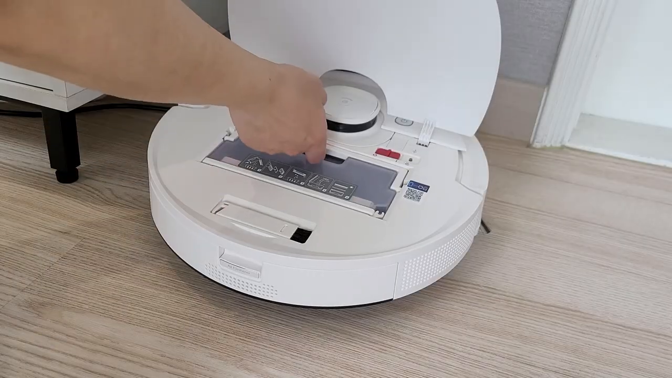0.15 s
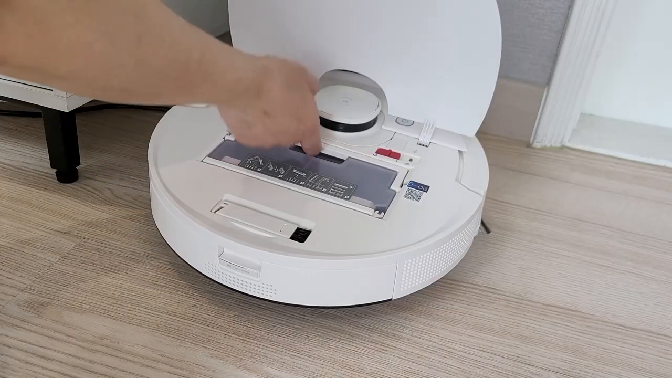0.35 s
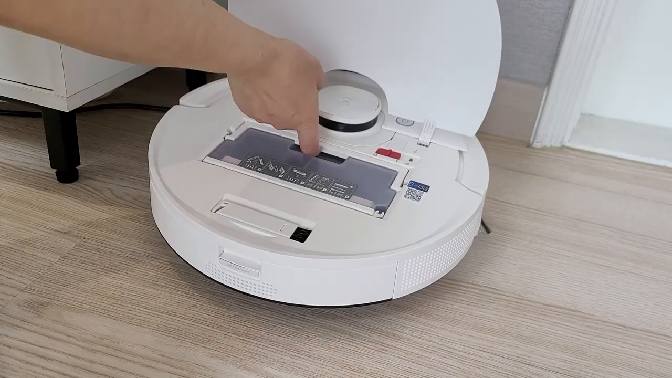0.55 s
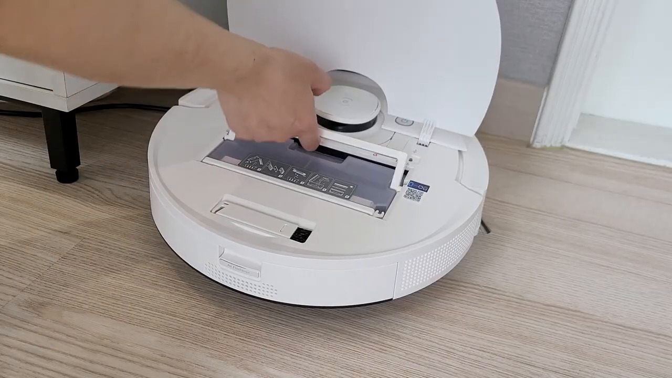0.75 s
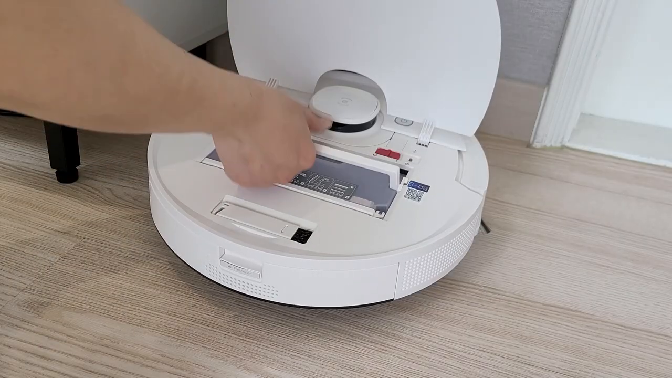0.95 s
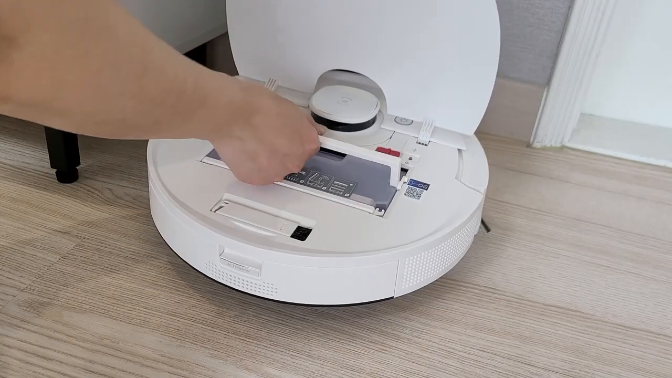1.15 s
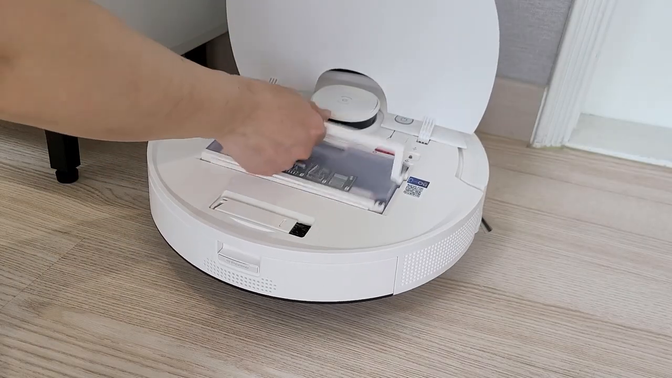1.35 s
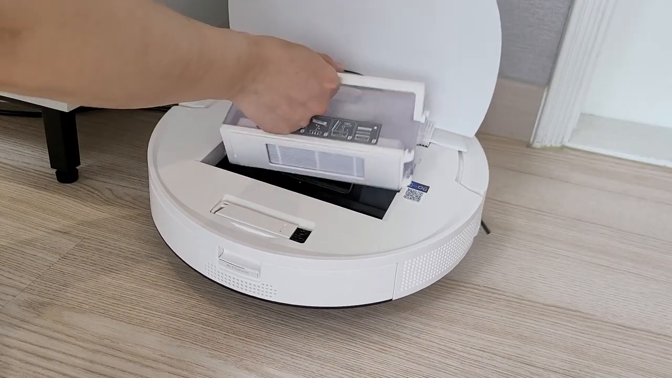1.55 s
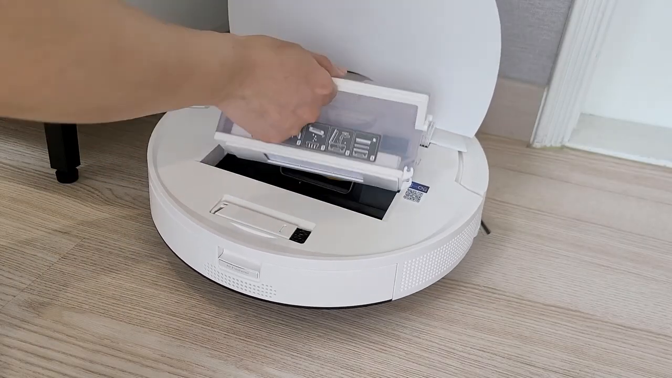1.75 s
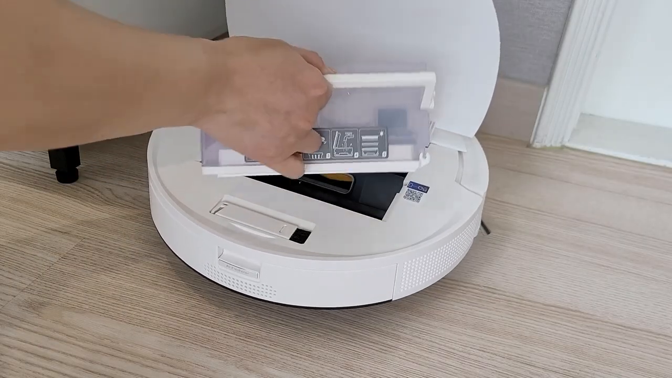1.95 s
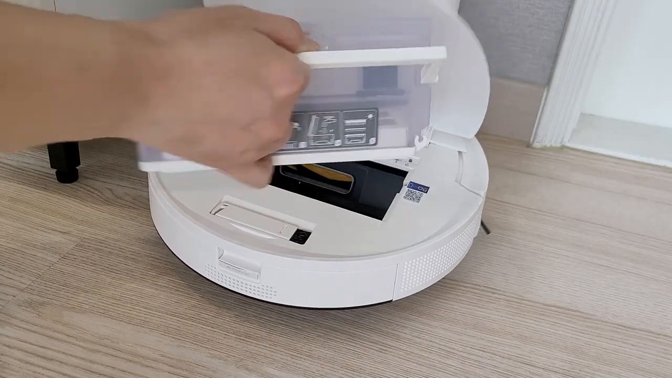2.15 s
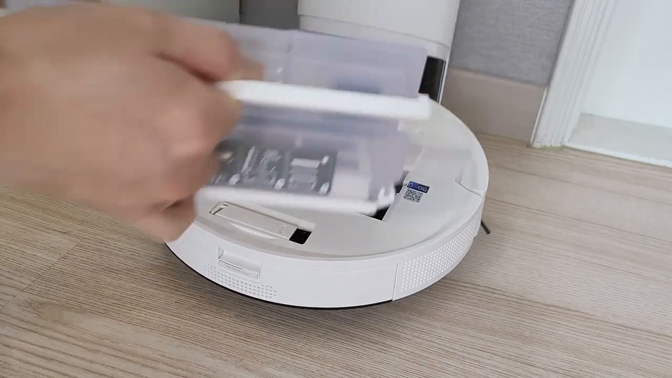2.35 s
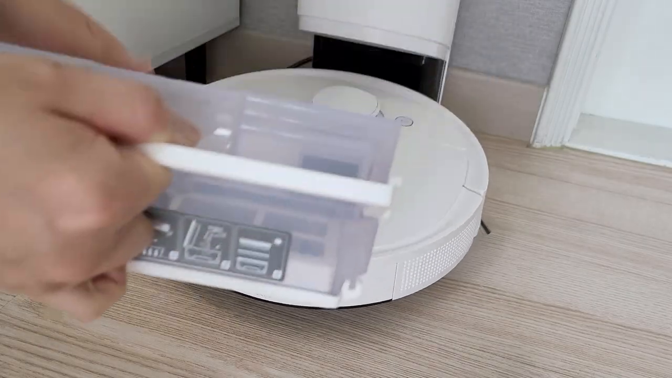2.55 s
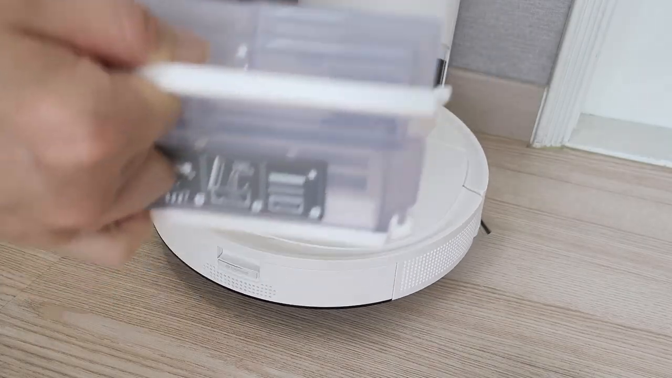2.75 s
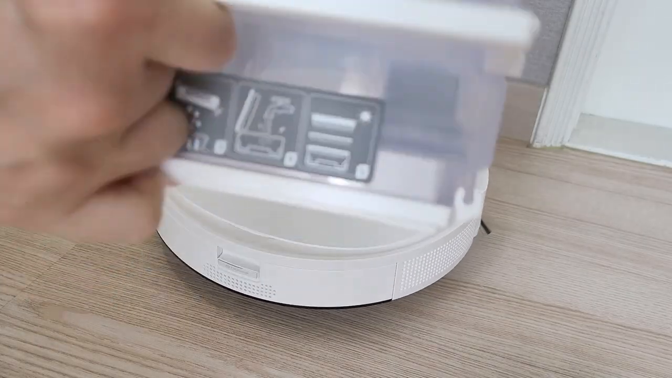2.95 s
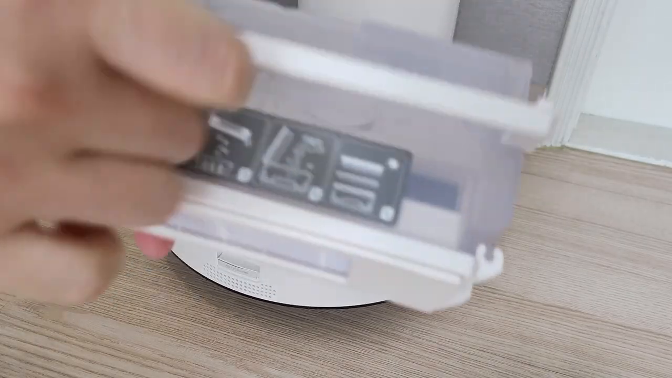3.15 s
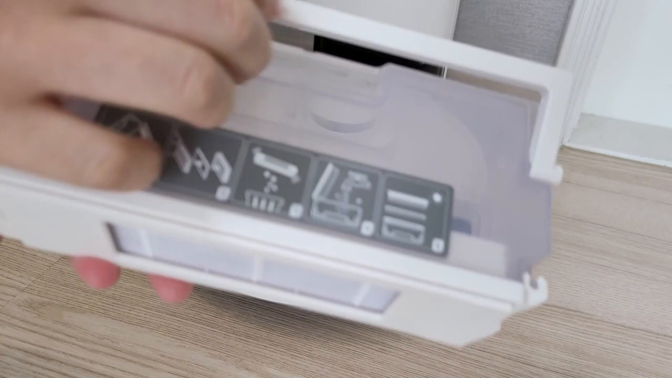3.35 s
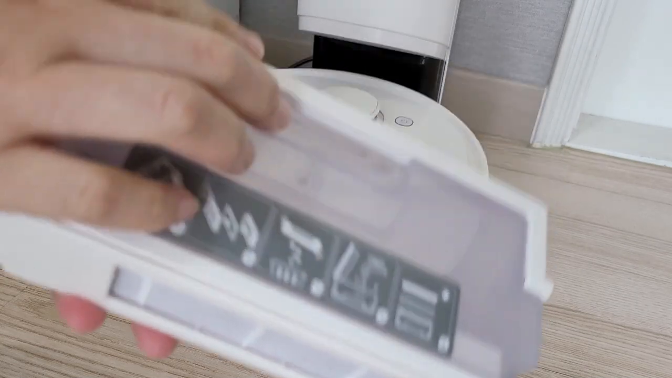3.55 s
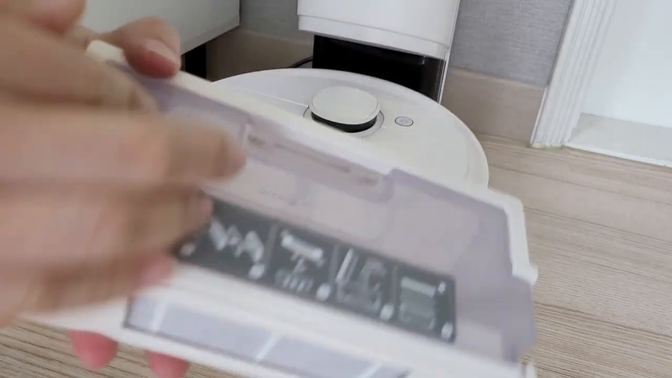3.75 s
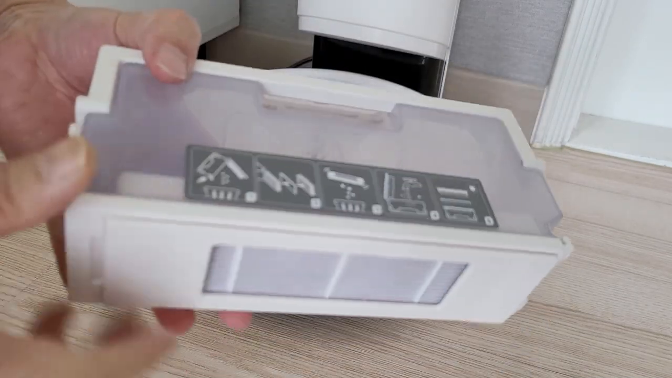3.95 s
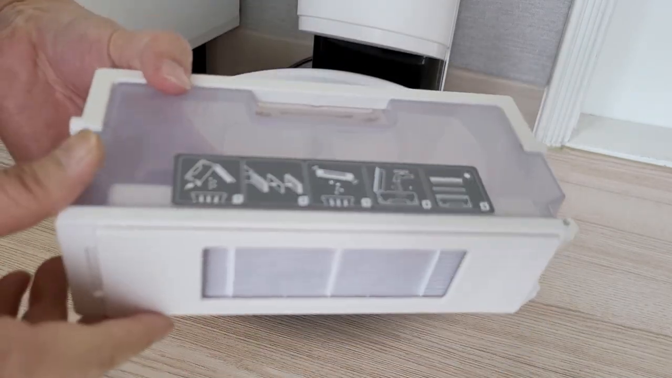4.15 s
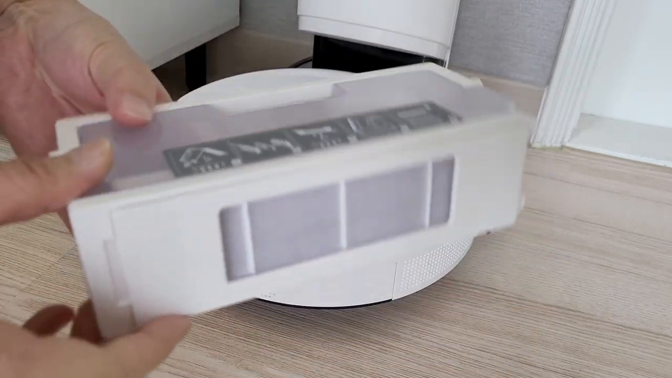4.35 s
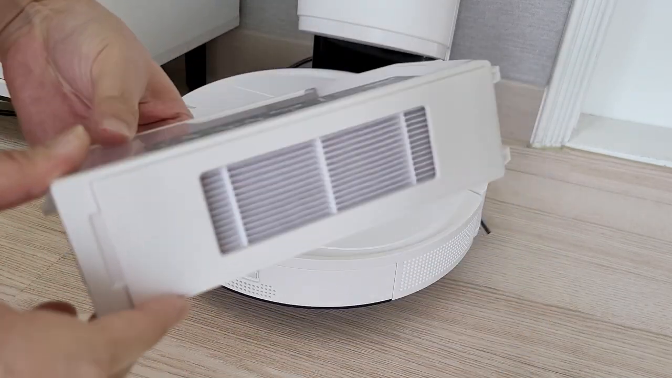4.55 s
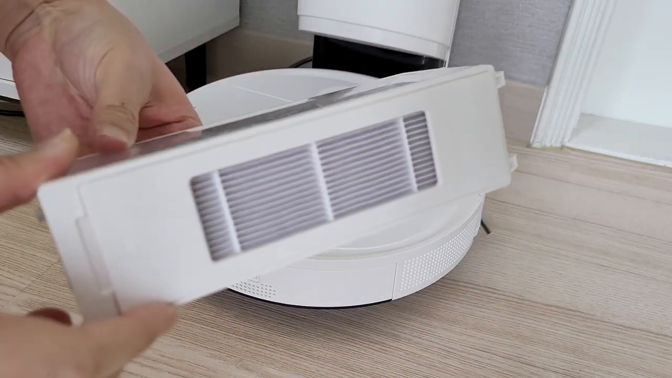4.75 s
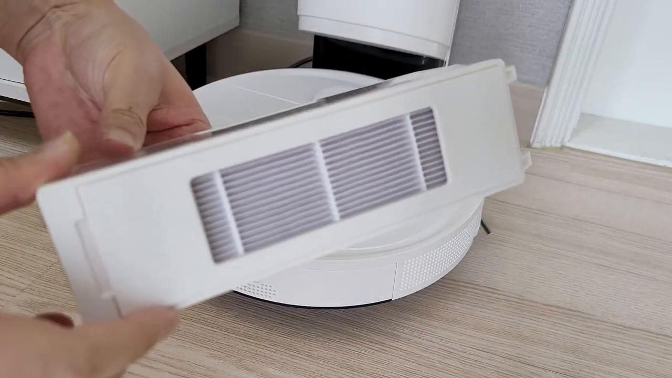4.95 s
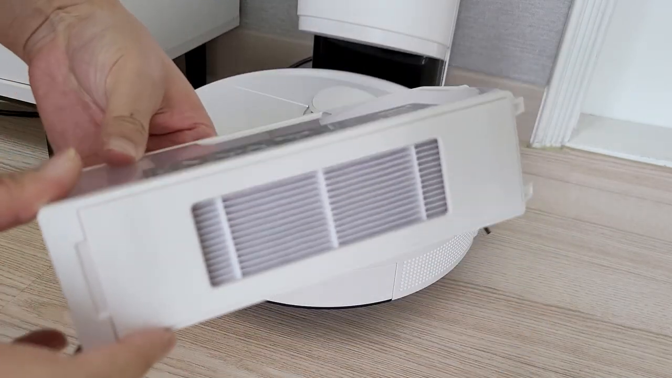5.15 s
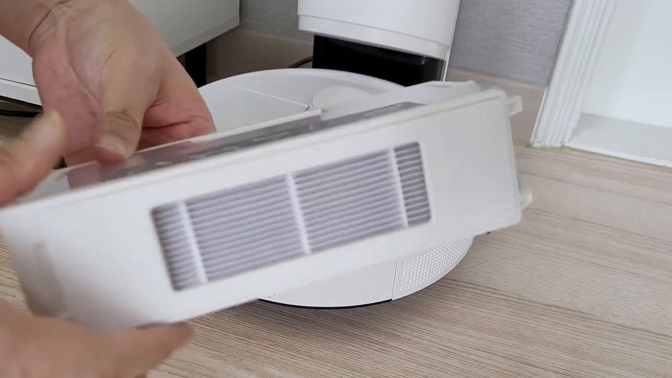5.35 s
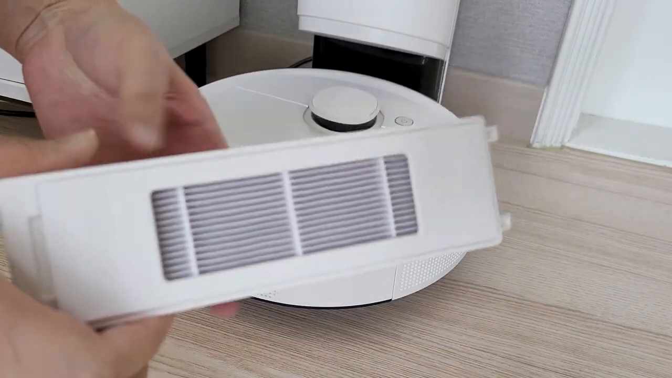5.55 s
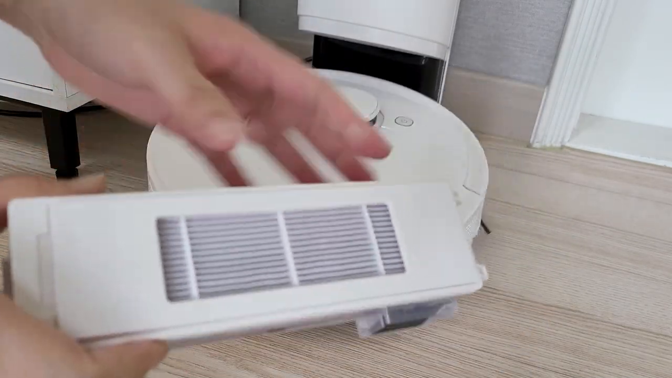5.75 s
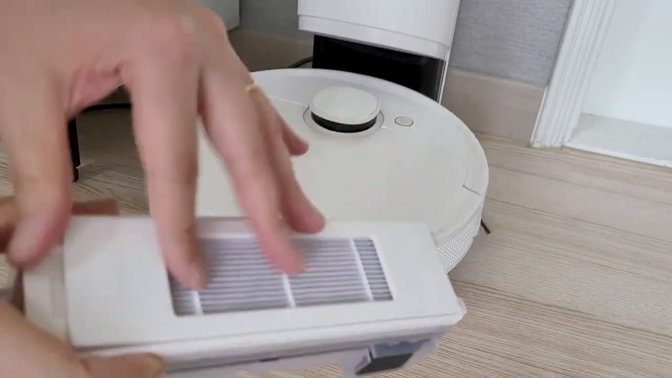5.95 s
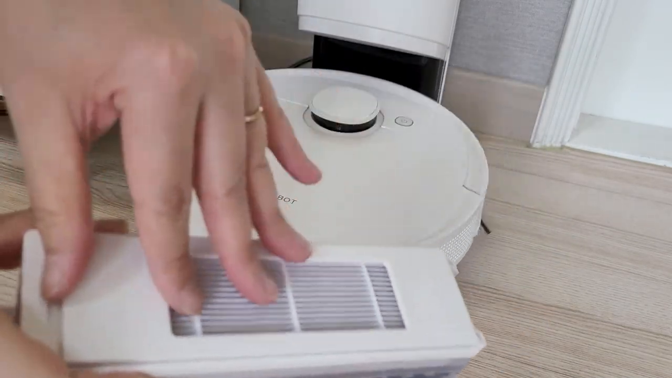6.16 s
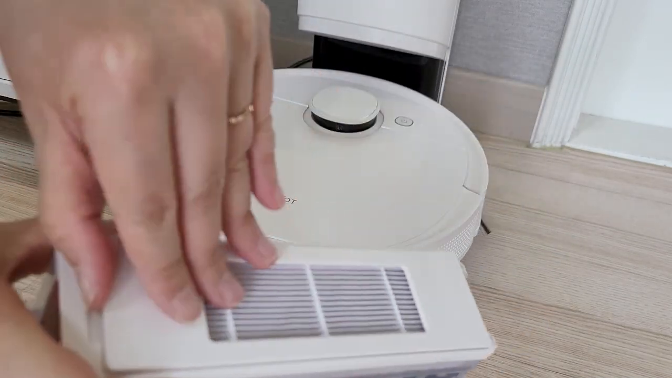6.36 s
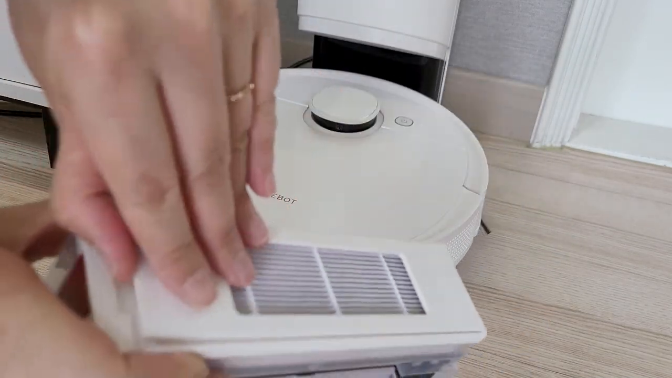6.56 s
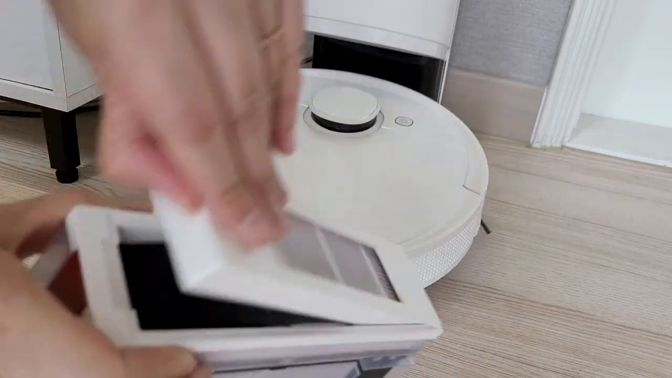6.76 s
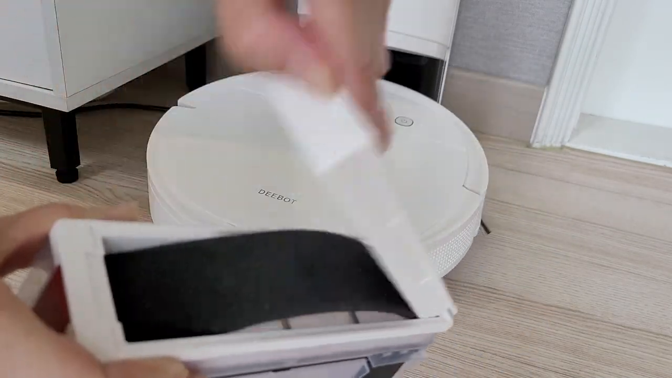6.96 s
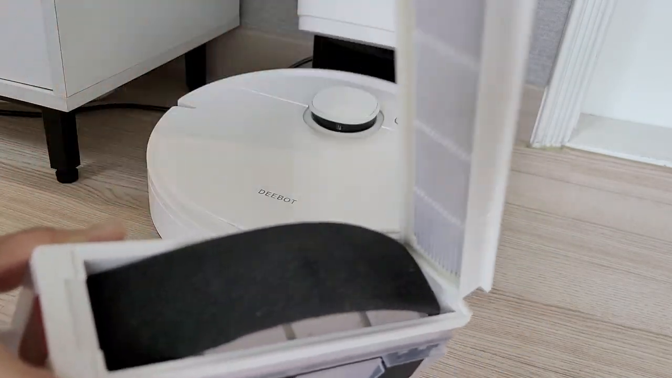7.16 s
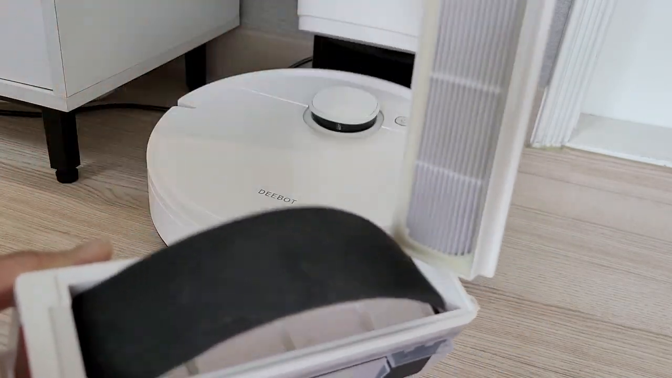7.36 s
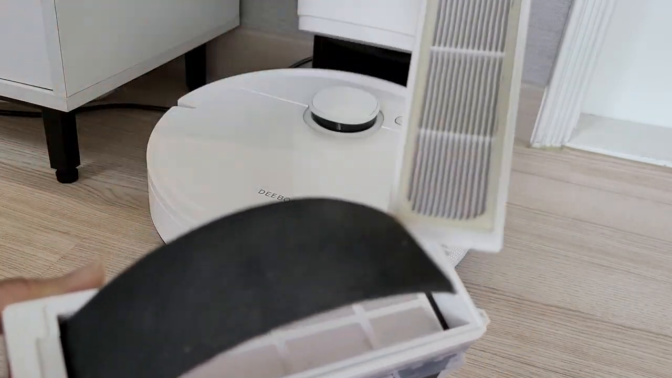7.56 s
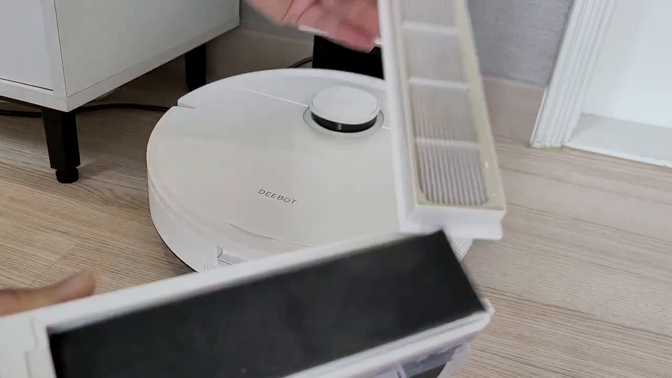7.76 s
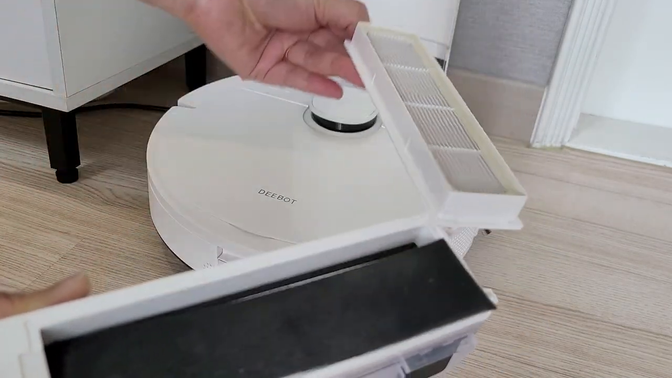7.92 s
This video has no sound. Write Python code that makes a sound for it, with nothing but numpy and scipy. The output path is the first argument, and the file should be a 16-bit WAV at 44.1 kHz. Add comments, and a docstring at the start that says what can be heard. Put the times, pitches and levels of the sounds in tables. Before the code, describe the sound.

A small, quiet room with faint low air noise, a barely audible wavering hum and soft rumble from the hand holding the microphone. Soft fingertip bumps lead to a moderate plastic clack at 0.6 seconds as a handle flips up, with more soft touches near 1.0. From 1.3 to 1.65 a loud, dense cluster of hollow knocks, rattles and scraping bursts out as the bin is tugged free. At 2.4 a lid slams with a full, low-bodied bang and short room echo. Small clicks and rubs around 3.0 to 3.4 precede a hard, bright, very short snap at 3.55. Then it is much quieter: light clicks and a scrape near 4.1, a gap, clicks at 5.6 and 5.9, skin scuffing from 6.1, dull plastic pops at 6.7, a tiny hoarse hinge squeak at 7.33, and light hollow knocks at 7.8 to 7.9 with a brief ring.

```python
"""Emptying a robot vacuum's dust bin

The dust bin comes out of a silent robot vacuum in a small, quiet room, close to a hand-held phone.
The handle flips up, the bin is tugged free and scrapes out, the lid drops shut, the handle snaps down.
Fingers then turn the hollow bin over and swing its filter frame open on a squeaky hinge.
Blows are a push, noisy clatter and ringing modes; rubbing is tiny slips or shaped noise.
Echoes, room noise, faint tones and the rumble of the hand on the phone lie around them."""
import sys
import numpy as np
from scipy import signal
from scipy.fft import rfft, irfft, next_fast_len
from scipy.io import wavfile
from scipy.ndimage import uniform_filter1d, minimum_filter1d

SR = 44100
rng = np.random.default_rng(int(sys.argv[2]) if len(sys.argv) > 2 else 0)


def store_wav(level_fs):
    """Save 16-bit WAV to argv[1]."""
    pcm = np.round(np.clip(np.atleast_2d(level_fs), -1, 1) * 32767)
    wavfile.write(sys.argv[1], SR, pcm.T.astype(np.int16))


N = 352359
TIME = np.arange(N) / SR

# Blows on the robot's body. Each row: start in seconds, level in dB, hardness in dB, lowest sound in Hz,
# wall resonance that is hit in Hz, its lift in dB, left minus right in dB.
BODY_KNOCKS = [(.613, -23, -5, 240, 401, 2, 5), (.6235, -15, -3, 175, 245, 6, 0),
               (.643, -21, -14, 150, 382, 6, 4), (.668, -25.5, -6.5, 197.8, 700, 3.5, 2),
               (.868, -30.5, -3.5, 170, 960, 3.5, 4), (1.347, -21, -9.5, 381.4, 500, 2, -0.5),
               (1.3565, -3, 1.5, 280, 540, 2.5, 3), (1.381, 6, -3.5, 428.3, 690, 8, -4.5),
               (1.399, -10.5, 4.5, 281.6, 2800, 0, -3.5), (1.412, -7, -6, 340.5, 430, 6, 3.5),
               (1.4262, 1.5, -4.5, 520.7, 898.5, 5.5, 2), (1.432, -11.5, -12, 220, 376, 6, -2.5),
               (1.44, -8.5, 8.5, 258.6, 840, 5.5, 4.5), (1.451, -8, -2.5, 381, 600, 3, -3),
               (1.474, -13, -7, 260, 610, -0.5, 0), (1.516, -19, -16, 297, 645, 5, -1),
               (1.607, -13.5, 3, 252, 460, 2.5, 0.5), (1.626, -15, -16, 271, 592, 6.5, -3.5),
               (2.455, -10, -0.5, 153, 560, 1.5, -0.5), (2.472, -7.5, -3.5, 71.8, 310, 1, -4),
               (2.497, -13, 3.5, 88.8, 169, 4, 3.5), (2.63, -27, -7, 136.5, 188, 2, 3)]
# Resonances of the body. Each row: pitch in Hz, level in dB, time to fade by 60 dB in seconds.
BODY_MODES = [(102.7, -5.5, 0.5), (178, -3, .17), (208, -1, 0.17), (258, -2.5, 0.093), (286, -5, 0.13),
              (385.5, 1, .32), (453.5, -1.5, .22), (560, -1, .35), (690, -0.5, 0.079), (740, -1.5, 0.32),
              (1003, -5, 0.16), (1346, -7, .14), (2050, -5, 0.17), (2320, -4, .18)]
# Treble of a body contact of ordinary hardness. The row: crack in dB, fizz in dB,
# dB of crack per dB of hardness (fizz follows hardness fully).
BODY_TREBLE = (-9, -26, .7)


def body_knocks():
    """Blows set the robot's plastic body clattering and ringing."""
    return blows(BODY_KNOCKS, BODY_MODES, BODY_TREBLE, tick_db=21, clatter_db=23.5, modes_db=9.5)


# Clicks of the bin, its handle and latches. Each row: start in seconds, level in dB, hardness in dB,
# lowest sound in Hz, wall resonance that is hit in Hz, its lift in dB.
BIN_CLICKS = [(.137, -35.5, -8.5, 540, 850, -2), (.186, -42.5, 1, 540, 900, 4),
              (1.068, -42.5, -3.5, 536, 710, 11.5), (1.306, -26.5, -6, 990, 1140, 7.5),
              (1.485, -8, 2.5, 700, 930, -12), (1.568, -5.5, -1, 629, 884, 5.5),
              (1.6055, -3.5, -2.5, 700, 1840, 2), (1.971, -43.5, 7.5, 600, 2830, 1),
              (2.025, -47, 1, 700, 2200, 2), (2.179, -46, 3.5, 804, 2320, -3),
              (2.237, -35, 7.5, 900, 1360, 6), (2.3491, -28, 27, 520, 550, 19),
              (2.886, -50, -1, 1020, 1435, 16), (3.009, -41, 3.5, 598, 870, 10.5),
              (3.042, -29, 1.5, 700, 1120, 7), (3.088, -24, 11.5, 591, 707, 15),
              (3.2, -34.5, 5.5, 540, 578, 1), (3.316, -32.5, 1, 603, 640, 10.5),
              (3.331, -30, -3.5, 599, 680, 0), (3.353, -27.5, -16, 596, 1550, 15.5),
              (3.366, -54, 12, 700, 12600, 8), (4.054, -27.5, 3, 2394, 2980, 4),
              (4.062, -29, 8, 1103, 3400, 11), (4.073, -32, 7, 1000, 1130, 7),
              (4.176, -31, -3, 540, 625, 7.5), (5.403, -55, 3.5, 1500, 5000, 0),
              (5.587, -36.5, 1.5, 700, 1110, 2.5), (5.652, -47.5, 9.5, 700, 2110, -3.5),
              (5.9, -30, 3.5, 788, 2090, 7), (5.919, -24, 1, 539, 2110, 12.5),
              (5.928, -26, -6, 552, 566, 2.5), (5.9645, -26.5, -5.5, 535, 1230, 8),
              (6.004, -41, 5.5, 700, 2150, -1), (6.697, -31, -3, 621, 614, 7.5),
              (6.716, -26.5, -18, 654, 736, 7.5), (6.749, -22.5, -9, 700, 1107, 8),
              (7.425, -51, -7, 601, 2290, 3), (7.631, -44, -13, 799, 1020, 7),
              (7.821, -24.5, -8.5, 560, 568, 1), (7.905, -20.5, -8.5, 607, 810, 3)]
# Resonances of the bin. Each row: pitch in Hz, level in dB, time to fade by 60 dB in seconds.
BIN_MODES = [(560, -3, .12), (686, -5, 0.085), (870, -6, 0.061), (1130, -2.5, .1), (1350, -4.5, 0.1),
             (1850, -4.5, 0.22), (1926, 0, 0.099), (2372, -9.5, .17), (2680, -2, .15), (3130, -4.5, 0.18),
             (3800, -5, 0.1), (5270, -3, .18), (6860, -6, .12), (8360, -8, .1), (12600, -6, .1)]
# Treble of a bin contact of ordinary hardness. The row: crack in dB, fizz in dB,
# dB of crack per dB of hardness (fizz follows hardness fully).
BIN_TREBLE = (-8.5, -27.5, 0.71)
# Where the hand holds the bin. Each row: time in seconds, left minus right in dB.
BIN_PAN = [(1.55, 3), (2.35, -3), (3.1, 2.5), (5.9, 6.5), (7.9, 4)]


def bin_clicks():
    """Clicks ring the bin's walls and are coloured by its hollow shell."""
    clicks = [(*row, np.interp(row[0], *np.transpose(BIN_PAN))) for row in BIN_CLICKS]
    return hollow_shell(blows(clicks, BIN_MODES, BIN_TREBLE, tick_db=12.5, clatter_db=23.5, modes_db=15.0))


# Broad peaks and dips of the bin's hollow shell. Each row: pitch in Hz, level in dB.
SHELL = [(430, -2.5), (580, 1.5), (800, -2.5), (1130, 2.5), (1480, -1), (1950, 1), (2400, -1.5),
         (2900, 2.5), (3600, -0.5), (4600, 0), (5500, 1), (7000, 2.5), (12000, -3.5)]


def hollow_shell(x):
    """The hollow shell strengthens some pitches and weakens others."""
    return colour(x, lambda f: undb(contour(f, SHELL)))


# The lid falls shut. The row: start in seconds, level in dB, clatter's 60 dB fade in seconds.
LID_SLAM = (2.4272, 4.7, 0.12)
# Colour of that blow. Each row: pitch in Hz, level in dB.
LID_TONE = [(35, -21.5), (70, -11), (105, -1.5), (135, -13), (185, 2), (320, -0.5), (560, 2), (850, -7.5),
            (1200, -10), (1700, -11.5), (2300, -8), (3300, -16), (6500, -20.5), (11000, -25), (15000, -27)]


def lid_slam():
    """The falling lid hits its stop and rings the body."""
    return shut(LID_SLAM, LID_TONE, BODY_MODES, pan_db=2.5, tick_db=25.0, clatter_db=24.5, modes_db=8)


# The handle snaps flat onto the bin. The row: start in seconds, level in dB, clatter's 60 dB fade in seconds.
HANDLE_SNAP = (3.555, -0.21, 0.013)
# Colour of that blow. Each row: pitch in Hz, level in dB.
HANDLE_TONE = [(200, -42), (450, -24.5), (680, -6), (850, -4), (1260, -0.5), (1550, -14), (2050, 3),
               (2350, -2), (2600, -9), (3300, -4), (3750, -7.5), (4050, -18.5), (4450, -6), (5600, -6.5),
               (8000, -12.5), (12000, -21.5), (15000, -22)]
# Resonances of the handle. Each row: pitch in Hz, level in dB, time to fade by 60 dB in seconds.
HANDLE_MODES = [(738, -3, .22), (1120, 1, .17), (1250, -1, .15), (1340, 1, .17), (1960, -5, .13),
                (2073, -6, .15), (2230, -6, .18), (2390, -5, .2), (3225, -3, .18), (3639, -4, .18),
                (4479, -5, .16), (5631, -5, .2), (7601, -4, .2)]


def handle_snap():
    """The handle stops hard against the bin and rings in its own modes."""
    return shut(HANDLE_SNAP, HANDLE_TONE, HANDLE_MODES, pan_db=3.5, tick_db=19, clatter_db=19.5, modes_db=7.5)


# The handle flips up. The row: start in seconds, level in dB, clatter's 60 dB fade in seconds.
HANDLE_FLIP = (.617, -11, 0.16)
# Colour of that blow. Each row: pitch in Hz, level in dB.
FLIP_TONE = [(40, -54), (135, -29), (180, 1), (400, 5), (750, 1), (1400, -5), (1900, -8), (2800, -14.5),
             (9000, -25.5), (12500, -14), (15000, -19.5)]


def handle_flip():
    """The handle hits its upper stop and rings the body."""
    return shut(HANDLE_FLIP, FLIP_TONE, BODY_MODES, pan_db=0.0, tick_db=17.5, clatter_db=26.0, modes_db=13.5)


def shut(blow, tone, modes, pan_db, tick_db, clatter_db, modes_db):
    """A hinged part hits its stop and sounds with its own colour."""
    out = np.zeros((3, N))
    start, db, ring_s = blow
    x = strike(modes, ring_s, pan_db, tick_db, clatter_db, modes_db)
    add(out, start, colour(x, lambda f: undb(db + contour(f, tone))))
    return out


# A firm blow seats at once, a light one chatters on:
# clatter time at 0 dB in seconds, and the dB of level that halve it.
CLATTER_S, CLATTER_HALVING_DB = 0.043, 45.5
# Sharpness of the wall resonance under a blow (centre over width).
WALL_Q = 6.1


def blows(table, modes, law, tick_db, clatter_db, modes_db):
    """Knocks and clicks on one plastic object; each favours the resonance of the wall it lands on."""
    out = np.zeros((3, N))
    for start, db, hardness_db, lowest_hz, wall_hz, lift_db, pan_db in table:
        clatter_s = CLATTER_S * 2 ** (-db / CLATTER_HALVING_DB)
        x = strike(modes, clatter_s, pan_db, tick_db, clatter_db, modes_db)
        x = colour(x, lambda f: np.hypot(1, undb(lift_db) * resonance(f, wall_hz, wall_hz / WALL_Q)))
        x = plastic(x, lowest_hz, *treble(law, hardness_db), top_db=-7 + 0.39 * hardness_db)
        add(out, start, undb(db) * x)
    return out


def strike(modes, ring_s, pan_db, tick_db, clatter_db, modes_db, contact_hz=2200, rise_s=.0007):
    """A push, a dense clatter of short wall modes and a few longer rings: left, right and all round."""
    size = 512 * int(np.ceil(.65 * max(mode[2] for mode in modes) * SR / 512))
    t = np.arange(size) / SR
    clatter = ears(size, 350) * fade(t, ring_s) * (1 - np.exp(-t / rise_s))
    push = np.zeros((2, size))
    lead = int(np.clip(pan_db * 1.8, -12, 12))  # in samples: the louder side hears it first
    push[0, max(-lead, 0)] = 1
    push[1, max(lead, 0)] = 1
    # a soft contact rounds off the push; the tiny offset avoids exact zeros
    pole = np.exp(-2 * np.pi * contact_hz / SR)
    push = undb(tick_db) * signal.lfilter([1 - pole], [1, -pole], push + 1e-18)
    rings = undb(modes_db) * ring(modes, size)
    x = push + undb(clatter_db) * even(clatter, 660) + rings
    # summed over all directions, the clatter has no peaks or dips
    all_round = undb(clatter_db) * (t == 0) + rings.sum(0) / np.sqrt(2)
    return np.vstack([x * sides(pan_db / 2), all_round])


def ring(modes, size):
    """Decaying modes, of equal energy at 0 dB; each blow and each side catches them differently."""
    t = np.arange(size) / SR
    hz, db, t60 = np.transpose(modes)[:, :, None]
    chance = rng.standard_normal((len(modes), 4)).T[:, :, None]
    swing = undb(db + 1.8 * chance[0]) * fade(t, t60) / np.sqrt(t60 * SR)
    angle = 2 * np.pi * hz * (1 + 0.0011 * chance[1]) * t + chance[2]
    spread = np.minimum(hz / 900, 1) * chance[3]  # the sides differ less in the bass
    return np.array([(swing * np.sin(angle + sign * spread)).sum(0) for sign in (1, -1)])


def plastic(x, lowest_hz, crack_db, fizz_db, bass_db=1, waist_db=0.0, mid_db=1, upper_db=0, top_db=-5):
    """A shell radiates little below its lowest mode; harder contacts add crack and fizz."""
    shape = [(250, bass_db), (750, 0.00022), (1450, 0.83 * crack_db + waist_db), (2300, crack_db + mid_db),
             (4500, (crack_db + fizz_db) / 2 + upper_db), (9000, fizz_db), (15000, fizz_db + top_db)]
    return colour(x, lambda f: undb(contour(f, shape)) / np.sqrt(1 + (lowest_hz / f) ** 10))


def treble(law, hardness_db):
    """Crack and fizz in dB: both grow as the contact gets harder."""
    crack_db, fizz_db, crack_share = law
    return crack_db + crack_share * hardness_db, fizz_db + hardness_db


# Plastic sliding on plastic. Each row: start in seconds, length in seconds, level in dB, hardness in dB.
SCRAPES = [(0.876, .12, -41.5, -8), (1.318, 0.09, -20.5, -19), (1.38, 0.18, -14.5, -14),
           (2.167, 0.2, -43.5, -10.5), (2.991, 0.2, -38, -5.5), (4.05, 0.054, -32.5, 9),
           (4.178, 0.12, -29.5, -10.5), (5.884, 0.089, -33, -6), (6.657, 0.11, -42.5, -10.5),
           (6.97, 0.14, -50.5, -12)]
# Treble of a rub of ordinary hardness. The row: crack in dB, fizz in dB,
# dB of crack per dB of hardness (fizz follows hardness fully).
RUB_TREBLE = (-11.5, -20, .25)
# A scrape presses hardest after this share of its length.
PRESS_PEAK_SHARE = .39
# Firmer rubbing reaches lower wall modes: lowest Hz at 0 dB, and dB of level per octave.
RUB_LOWEST_HZ, RUB_OCTAVE_DB = 250, 35.5


def scrapes(grain_db=2.5, slips_per_s=6000, grip_db=3.0, wall_t60=0.0063, modes_db=-8, left_db=0, size=8000):
    """Sliding catches and lets go: dense tiny slips under an uneven grip ring the bin's walls."""
    out = np.zeros((2, N))
    for start, length, db, hardness_db in SCRAPES:
        t = np.arange(SR // 2) / SR
        push, grain, grip = rng.standard_normal((3, len(t)))
        slow_grip = unit(uniform_filter1d(grip, size=600))
        happens = rng.random(len(t)) < slips_per_s / SR
        slips = happens * push * undb(grain_db * grain + grip_db * slow_grip)
        pressure = np.interp(t / length, [0, PRESS_PEAK_SHARE, 1], [0, 1.4, 0], right=0)
        wall = ears(size, 400) * fade(np.arange(size) / SR, wall_t60)
        wall = even(wall, 550) + undb(modes_db) * ring(BIN_MODES, size)
        x = signal.fftconvolve((unit(slips) * pressure)[None], wall, axes=1)
        lowest_hz = RUB_LOWEST_HZ * 2 ** (-db / RUB_OCTAVE_DB)
        x = plastic(x, lowest_hz, *treble(RUB_TREBLE, hardness_db))
        add(out, start, x * undb(db) * sides(left_db))
    return hollow_shell(out)


# Fingers sliding over the bin and its filter.
# Each row: start in seconds, length in seconds, level in dB, tilt in dB per octave.
STROKES = [(.005, 0.065, -60, 0.5), (1.187, 0.14, -61.5, -1), (1.717, 0.42, -70, 2),
           (2.735, 0.33, -65.5, 3), (2.97, 0.25, -56, -0.5), (3.175, 0.13, -69, 0),
           (3.284, 0.12, -57.5, 2.5), (3.408, 0.31, -62, 8.5), (3.959, 0.15, -66, -0.5),
           (5.341, .11, -78, 3), (5.46, 0.13, -77, 1), (5.511, .12, -69.5, 0), (6.076, 0.24, -60, -0.5),
           (6.181, 0.16, -58.5, 0), (6.46, .11, -73, 3), (6.638, 0.072, -54, -2.5)]
# Colour of skin on the hollow bin. Each row: pitch in Hz, level in dB.
SKIN = [(350, -14), (700, 3), (1250, 0), (1900, -7.5), (2800, 2), (3400, -4), (4300, -1), (6300, -2.5),
        (9000, -6.5), (12500, -9), (15000, -13)]


def strokes(scuff_db=4, scuffs_per_s=70, left_db=0.75, size=20000):
    """Skin drags in tiny grips and slips: a grainy swell whose bands scuff on their own as the fingers roll."""
    out, t = np.zeros((2, N)), np.arange(size) / SR
    for start, length, db, tilt_db in STROKES:
        hiss = 0
        for band, (hz, band_db) in zip(bands(ears(size, 400), SKIN), SKIN):
            tilted_db = band_db + tilt_db * np.log2(hz / 4000)
            hiss = hiss + band * undb(tilted_db + scuff_db * walk(scuffs_per_s, size))
        grain = undb(3 * walk(700, size) + 2.5 * walk(90, size))
        pressure = np.sin(np.pi * np.minimum(t / length, 1)) ** 2
        add(out, start, unit(hiss * grain) * pressure * undb(db) * sides(left_db))
    return out


# A sliding contact catches and sings hoarsely on one resonance.
# Each row: start in seconds, length in seconds, from Hz, to Hz, level in dB.
CATCHES = [(.872, 0.085, 908, 1343, -56), (1.328, 0.017, 636, 604, -37.5), (2.19, .11, 1250, 1463, -53.5),
           (2.86, 0.048, 13000, 12600, -57.5), (3.0, 0.11, 12730, 12100, -62),
           (4.205, 0.061, 560, 691, -45.5), (6.15, 0.12, 789, 736, -63), (6.19, 0.14, 3440, 4310, -65),
           (6.205, 0.11, 5900, 5200, -65)]


def catches(width_hz=110, width_share=.04, waver=0.016, flutter_db=3, size=8000):
    """Uneven slips keep one resonance singing; it glides and wavers as the contact moves."""
    out, t = np.zeros((2, N)), np.arange(size) / SR
    for start, length, from_hz, to_hz, db in CATCHES:
        hz = np.interp(t, [0, length], [from_hz, to_hz]) * (1 + waver * walk(60, size))
        width = width_hz + width_share * from_hz
        slips = colour(ears(size, 30), lambda f: 1 / (1 + (f / width) ** 2))
        song = unit(slips * np.sin(2 * np.pi * np.cumsum(hz) / SR))
        pressure = np.sin(np.pi * np.minimum(t / length, 1))
        add(out, start, song * pressure * undb(db + flutter_db * walk(120, size)))
    return out


# Soft fingertip bumps on the body. Each row: time in seconds, level in dB, pitch in Hz.
BUMPS = [(0.015, -41.5, 406), (0.336, -44, 378), (0.455, -47.5, 418), (0.511, -42.5, 376), (.97, -43, 390),
         (0.9859, -26.5, 306.5), (.999, -35, 300), (1.013, -38.5, 345.8), (1.026, -42.5, 270),
         (1.067, -47.5, 338)]


def bumps(push_s=.0014, left_db=1.3, size=2000):
    """A soft fingertip moves only the body's low, well damped resonance."""
    out, t = np.zeros((2, N)), np.arange(size) / SR
    for start, db, hz in BUMPS:
        x = t / push_s * np.exp(1 - t / push_s) * np.sin(2 * np.pi * hz * t)
        x = colour(x, lambda f: 1 / (1 + (f / 900) ** 4) / np.sqrt(1 + (160 / f) ** 8))
        add(out, start - .001, x * undb(db) * sides(left_db))
    return out


# The hinge squeaks, then rasps as it lets go. Each of the two rows: full at this time in seconds,
# hold in seconds, level in dB, rise in dB per second, fall in dB per second.
SQUEAK = (7.334, .014, -34.5, 1150, 1600)
HINGE_RASP = (7.348, .015, -44, 600, 1300)
# Slips per second while it squeaks, and their speeding up once it lets go (at most one octave in all).
SLIP_HZ, SLIP_OCTAVES_PER_S = 410, 24
# Resonances of the filter frame. Each row: pitch in Hz, width in Hz (before squaring), level in dB.
FRAME = [(400, 50, -21), (560, 50, 1), (825, 170, -4), (1170, 220, -14), (1400, 67, -2.5), (2530, 670, -24),
         (3630, 540, -30)]
# Colour of the hinge's rasp. Each row: pitch in Hz, level in dB.
RASP = [(300, -24), (700, 8), (1400, 5), (2200, -4), (3800, -4), (6000, -18), (9000, -26), (14000, -50)]
# The frame rings on after its last click, at this time in seconds.
FRAME_CLICK_S = 7.905
# Modes of that ring. Each row: pitch in Hz, peak in dB, time to fade by 60 dB in seconds.
FRAME_MODES = [(775, -51, .3), (830, -57, .2), (1184, -57, .2), (1400, -57, .22), (2350, -63, .15),
               (3560, -62, .17), (3655, -57, .25), (3730, -61, .2), (4156, -67, .18), (4230, -70, .15),
               (6148, -70, .18), (6230, -72, .15)]


def filter_frame(jitter=.09, grit_db=-5, left_db=2.2, size=12000):
    """The hinge squeaks as nearly regular slips drive the frame, then rasps; later the frame rings briefly."""
    out, t = np.zeros((2, N)), np.arange(size) / SR
    now = SQUEAK[0] + t - t[-1] / 2
    let_go_s = SQUEAK[0] + SQUEAK[1]
    rate = SLIP_HZ * 2 ** np.clip(SLIP_OCTAVES_PER_S * (now - let_go_s), 0, 1)
    wobble = unit(uniform_filter1d(rng.standard_normal(size), size=150))
    turns = np.cumsum(rate * (1 + jitter * wobble)) / SR
    # one pulse at each whole turn, plus a little noise
    slips = np.diff(np.floor(turns), prepend=0) * np.sqrt(SR / rate)
    slips = slips + undb(grit_db) * rng.standard_normal(size)
    squeak = colour(slips, lambda f: sum(undb(db) * resonance(f, hz, width) ** 2 for hz, width, db in FRAME))
    # the right side hears it 8 samples later
    squeak = np.array([squeak, np.roll(squeak, 8)]) / np.std(squeak[:size // 2])
    # every slip tears off a short burst of noise
    bursts = ears(size, 900) * np.exp(-2 * (turns % 1))
    rasp = unit(colour(bursts, lambda f: undb(contour(f, RASP))))
    add(out, now[0], squeak * swell(now, *SQUEAK) + rasp * swell(now, *HINGE_RASP))
    after = 0
    for hz, db, t60 in FRAME_MODES:
        phase = rng.normal(size=(2, 1))
        after = after + undb(db) * np.sin(2 * np.pi * hz * t + phase) * fade(t, t60)
    add(out, FRAME_CLICK_S, after)
    return out * sides(left_db)


# The room's answer. Each row: band centre in Hz, level in dB, time to fade by 60 dB in seconds.
ROOM = [(100, -8, 0.24), (254, -11.5, 0.5), (700, -8.5, 0.35), (1840, -8, 0.31), (5150, -8.5, 0.38),
        (12800, -6, 0.26)]
# Standing waves between the walls. Each row: pitch in Hz, level in dB, time to fade by 60 dB in seconds.
ROOM_MODES = [(108, -26, .55), (161, -25, .55), (199, -31, .44), (301, -27, .3), (382, -35, .55),
              (458, -31, .44), (555, -35, .42)]
# How much of the handling reaches the room. Each row: time in seconds, room share in dB.
ROOM_SHARE = [(0, -1), (2.5, 6.5), (3.2, -1.5), (3.56, -1), (8, 0)]


def room(x, build_s=0.011, late_db=-27, late_t60=0.45, size=36000):
    """Floor and near walls answer in uneven clusters of echoes; a faint tail and low standing waves linger."""
    x = x * undb(np.interp(TIME, *np.transpose(ROOM_SHARE)))
    t, response = np.arange(size) / SR, 0
    clusters = undb(2.5 * walk(160, size))
    for band, (_, db, t60) in zip(bands(ears(size, 300), ROOM), ROOM):
        decay = (fade(t, t60) + undb(late_db) * fade(t, late_t60)) * (1 - np.exp(-(t / build_s) ** 2))
        decay = decay * clusters * undb(2 * walk(50, size))
        response = response + undb(db) * band * decay / np.sqrt(np.sum(decay ** 2))
    response = response + ring(ROOM_MODES, size)
    return signal.fftconvolve(x[None], response, axes=1)[:, :N]


# The hand that holds the phone shifts its grip. Each row: time in seconds, rumble in dB.
GRIP_SHIFTS = [(1.7, -55), (2.62, -58), (3.33, -60), (4.16, -56), (5.0, -65), (6.621, -61.5), (7.25, -58),
               (7.5, -64), (7.86, -47)]
# Each shift swells and dies away (time constants in seconds) over a steady tremor in dB.
GRIP_RISE_S, GRIP_FALL_S, TREMOR_DB = 0.062, 0.14, -76.5


def grip_rumble(rumble_hz=62, rumble_width_hz=45):
    """The hand on the phone makes a low rumble that swells with each shift of grip."""
    rumble = colour(ears(N, 100), lambda f: resonance(f, rumble_hz, rumble_width_hz) ** 2)
    shifts = 0
    for s, db in GRIP_SHIFTS:
        distance = np.maximum((s - TIME) / GRIP_RISE_S, (TIME - s) / GRIP_FALL_S)
        shifts = shifts + undb(db) * np.exp(-distance)
    return unit(rumble) * (undb(TREMOR_DB) + shifts)


# Still air indoors, before a gentle bass cut. Each row: pitch in Hz, relative level in dB per Hz.
AIR = [(30, -6), (65, 0), (125, -23), (175, -6), (235, -3), (310, -14), (480, -12), (700, -15),
       (1100, -22.5), (2500, -31.5), (4200, -44), (7000, -54), (10000, -47), (12500, -51), (13500, -66)]
AIR_DB = -63.5  # overall level


def still_air():
    """Steady room noise, with a gentle cut below 70 Hz."""
    air = colour(ears(N, 410), lambda f: undb(contour(f, AIR)) * f ** 2 / (f ** 2 + 70 ** 2))
    return unit(air) * undb(AIR_DB)


# A faint hum indoors. Each row: middle pitch in Hz, middle level in dB.
HUM = [(59.2, -74), (241, -73.5), (388, -81), (487, -81.5), (673, -87)]
# Faint far-off tones that glide. Each row: start in seconds, length in seconds, from Hz, to Hz, level in dB.
GLIDES = [(4.149, 0.51, 339, 325, -75.5), (4.6, 1.06, 235.6, 304.7, -74.5), (5.05, 0.777, 482.5, 491, -72),
          (5.499, 0.46, 335, 318, -72)]


def faint_tones(waver=0.036, waver_db=3):
    """The hum wavers in pitch and level; other far-off tones glide in and out."""
    out = 0
    for hz, db in HUM:
        out = out + tone(hz * (1 + waver * walk(3.2, N))) * undb(db + waver_db * walk(2.2, N))
    for start, length, from_hz, to_hz, db in GLIDES:
        part = np.clip((TIME - start) / length, 0, 1)
        out = out + tone(from_hz + (to_hz - from_hz) * part) * np.sin(np.pi * part) * undb(db)
    return out


def tone(hz):
    """Sine of rms 1 that follows a changing pitch."""
    return np.sqrt(2) * np.sin(2 * np.pi * np.cumsum(hz) / SR)


def undb(db):
    """Decibels to gain."""
    return 10 ** (np.asarray(db) / 20)


def sides(left_db):
    """Gains that raise the left and lower the right by the same dB."""
    return undb(np.array([[left_db], [-left_db]]))


def unit(x):
    """Scale to rms 1."""
    return x / np.sqrt(np.mean(x ** 2))


def fade(t, t60):
    """Exponential decay by 60 dB in t60 seconds."""
    return np.exp(-np.log(1000) * t / t60)


def swell(t, full_s, hold_s, db, rise, fall):
    """Gain that rises, holds and falls, at rates in dB per second."""
    return undb(db - rise * np.maximum(full_s - t, 0) - fall * np.maximum(t - full_s - hold_s, 0))


def add(out, s, x):
    """Mix a sound of several channels in at time s."""
    i = max(int(s * SR), 0)
    out[:, i:i + x.shape[1]] += x[:, :max(N - i, 0)]


def contour(hz, points):
    """Read (Hz, value) points on a log-frequency axis."""
    f, value = np.transpose(points)
    return np.interp(np.log(hz + 1), np.log(f), value)


def colour(x, gain):
    """Causal filter whose magnitude is gain(Hz)."""
    n = 2 * next_fast_len(x.shape[-1] // 2 + 2048)
    # folding the cepstrum gives the filter minimum phase
    cepstrum = irfft(np.log(gain(np.arange(n // 2 + 1) * SR / n + 1) + 1e-6))
    cepstrum[1:n // 2] *= 2
    cepstrum[n // 2 + 1:] = 0
    return irfft(rfft(x, n) * np.exp(rfft(cepstrum)))[..., :x.shape[-1]]


def resonance(hz, centre, width):
    """Magnitude of one resonance, 1 at its centre."""
    return 1 / np.sqrt(1 + ((hz ** 2 - centre ** 2) / (hz * width)) ** 2)


def ears(size, alike_hz):
    """Two noises, alike in the bass and unrelated in the treble."""
    mid, side = rng.standard_normal((2, size))
    side = colour(side, lambda f: 1 / np.sqrt(1 + (alike_hz / f) ** 6))
    return np.array([mid + side, mid - side]) / np.sqrt(2)


def even(x, width_hz):
    """Give a burst the same strength in every band of this width, at energy 1 a side."""
    power = np.mean(np.abs(rfft(x)) ** 2, axis=0)
    power = uniform_filter1d(power, size=int(width_hz * x.shape[1] / SR) + 1)
    return colour(x, lambda f: np.interp(f, np.linspace(0, SR / 2, len(power)), power) ** -.5)


def walk(rate, size):
    """Slow chance: random levels, rate of them per second, joined by smooth slides; spread near 1."""
    steps = np.arange(size) * rate / SR
    values = rng.standard_normal(400)
    k, part = steps.astype(int), np.sin(np.pi / 2 * (steps % 1)) ** 2
    return values.take(k, mode="wrap") * (1 - part) + values.take(k + 1, mode="wrap") * part


def bands(noise, table):
    """Split a noise into overlapping bands, one at the frequency of each row."""
    spectrum = rfft(noise)
    hz = np.arange(spectrum.shape[1]) * SR / noise.shape[1]
    split = []
    for k in range(len(table)):
        peak = [(row[0], j == k) for j, row in enumerate(table)]
        split.append(irfft(spectrum * contour(hz, peak)))
    return split


def scene():
    """All the handling, its echo and the quiet room."""
    struck = body_knocks() + bin_clicks() + lid_slam() + handle_snap() + handle_flip()
    rubbed = scrapes() + strokes() + catches() + bumps() + filter_frame()
    # the third struck channel is what goes out all round
    all_round = struck[2] + rubbed.sum(0) / np.sqrt(2)
    background = still_air() + faint_tones() + grip_rumble()
    return struck[:2] + rubbed + room(all_round) + background


TOP_HZ = 15900  # the treble ends here


def record(dry, ceiling=.93, size=120):
    """The phone's limiter holds the highest peaks down; a steep filter cuts the top."""
    needed = ceiling / np.maximum(np.abs(dry).max(0), ceiling)
    gain = uniform_filter1d(minimum_filter1d(needed, size=size), size=size)
    low_pass = signal.ellip(8, .2, 70, TOP_HZ, fs=SR, output="sos")
    return signal.sosfilt(low_pass, dry * gain)


dry = scene()
out = record(dry)
store_wav(out)
```